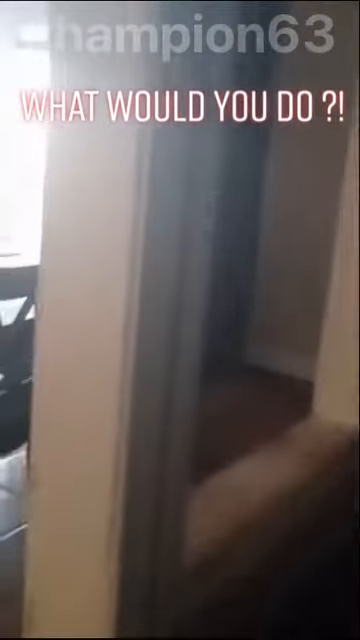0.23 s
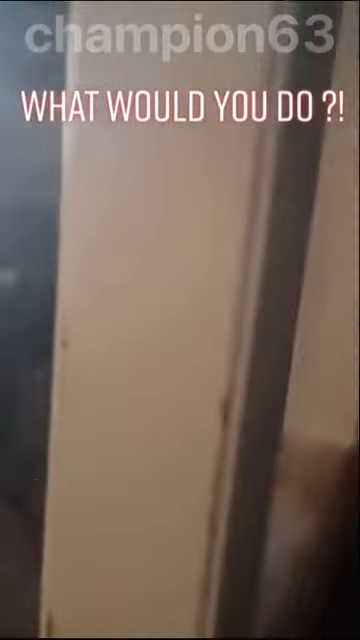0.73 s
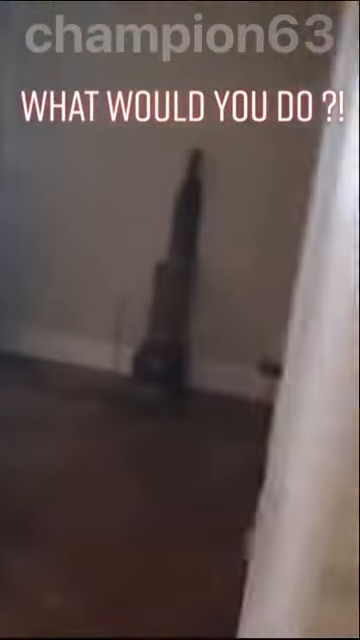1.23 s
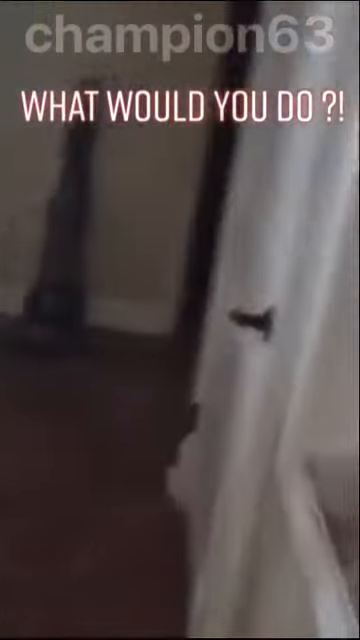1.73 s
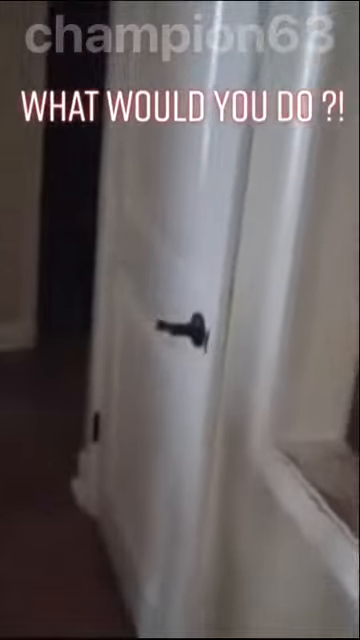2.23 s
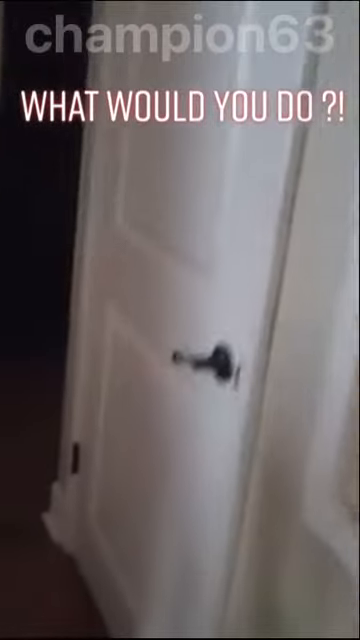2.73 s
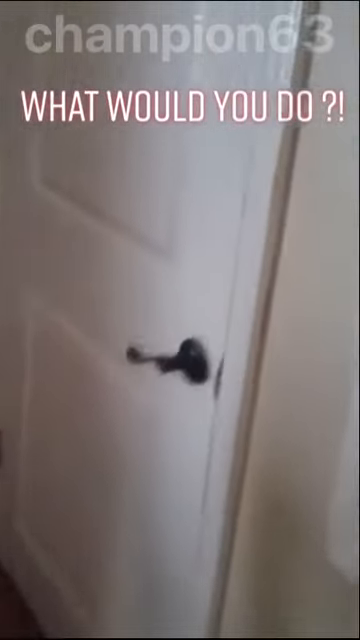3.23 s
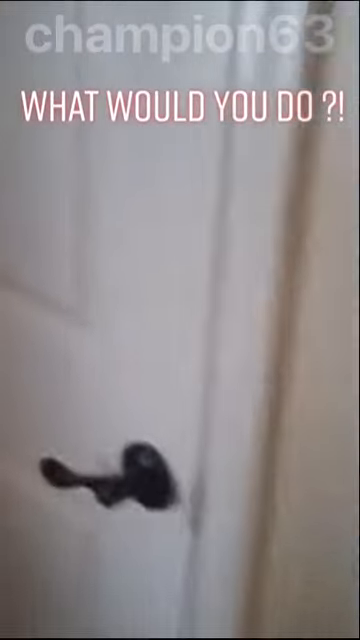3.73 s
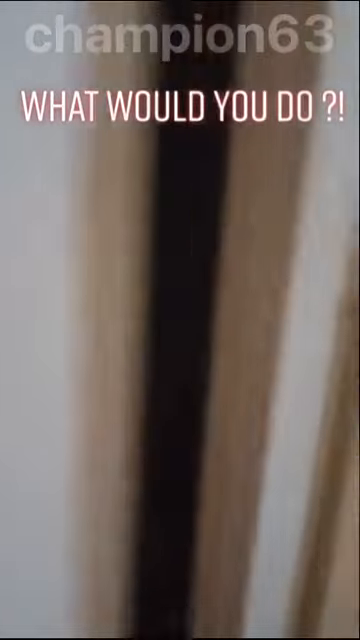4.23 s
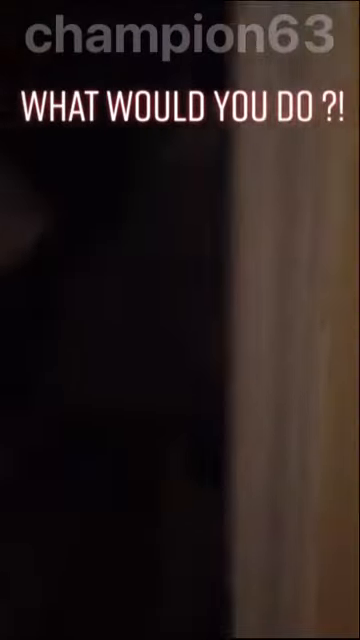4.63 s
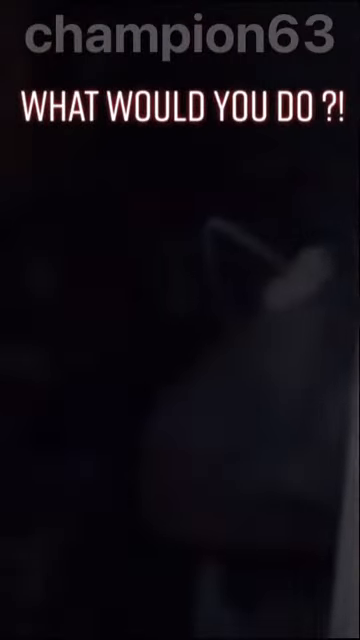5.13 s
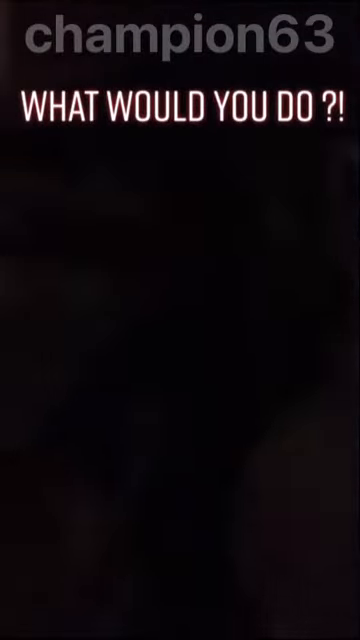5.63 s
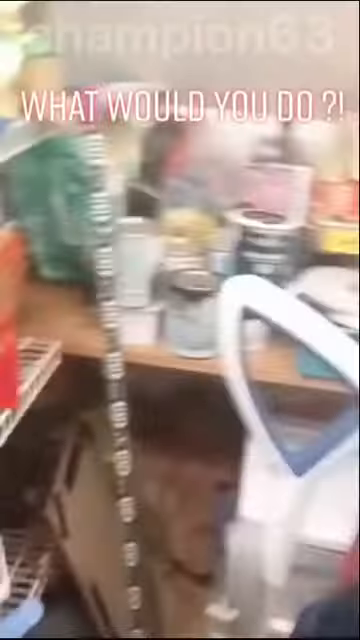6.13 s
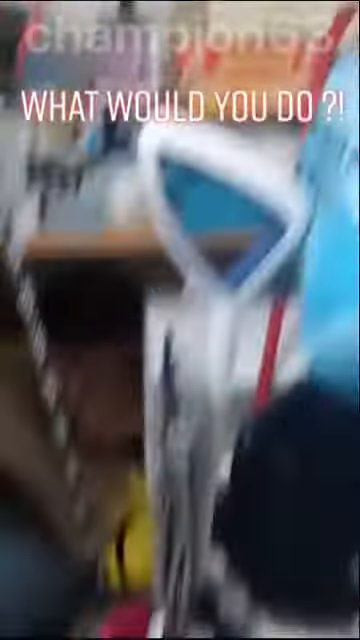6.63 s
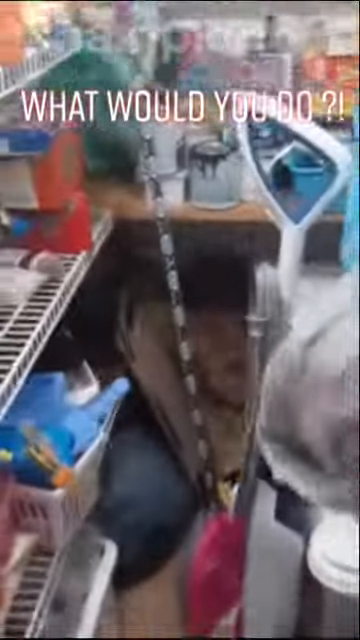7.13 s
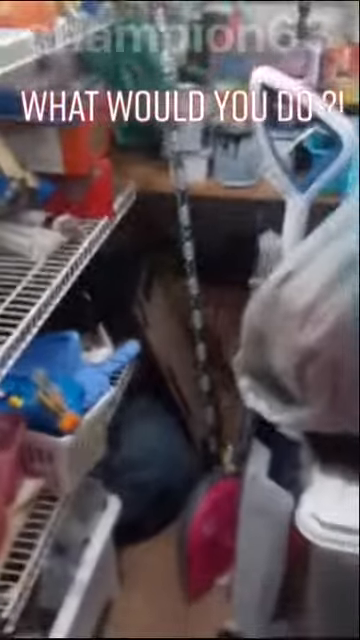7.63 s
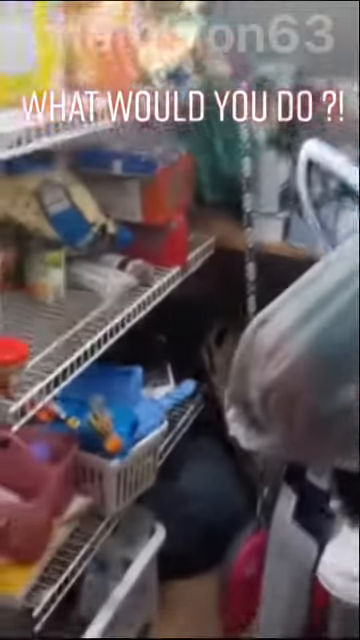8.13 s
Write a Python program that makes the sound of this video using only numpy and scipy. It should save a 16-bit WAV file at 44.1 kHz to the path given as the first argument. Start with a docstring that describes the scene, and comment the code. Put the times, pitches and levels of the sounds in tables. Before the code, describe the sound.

The tail of an earlier bang opens, then evenly spaced heavy thuds ring a hollow door and shake its frame in a reverberant hall until about two and a half seconds. A quiet gap follows. The handle snaps open with bright metallic clatter, the door knocks hard, hands and cloth rub, and goods in a small pantry tick and bump, over faint rumble and hiss on a handheld phone.

```python
"""Banging on a hollow pantry door

Bangs boom through a tiled hall: ringing modes of leaf and panels, and a noisy rattle of the frame.
Then the latch clatters, door and goods knock and tick (modes and noise bursts), hands and cloth rustle.
House rumble and faint hiss lie beneath, as noise shaped in third-octave bands.
The sound is wide at first; just before 4 s it closes to the same signal in both channels."""
import sys
import numpy as np
from scipy import signal
from scipy.fft import rfft, irfft, next_fast_len
from scipy.io import wavfile
from scipy.ndimage import uniform_filter1d

SR = 44100
rng = np.random.default_rng(int(sys.argv[2]) if len(sys.argv) > 2 else 0)


def waveform_to_disk(signal):
    """Save audio, clipped to [-1, 1], as 16-bit WAV at the path in sys.argv[1]."""
    frames = np.transpose(np.atleast_2d(signal))
    scaled = np.clip(frames, -1, 1) * 32767
    samples = np.round(scaled).astype(np.int16)
    wavfile.write(sys.argv[1], SR, samples)


N = 369990  # length in samples

# Bangs on the door; the first precedes the start, so only its tail sounds. Each row: start in seconds,
# panel in dB, boom of the whole leaf in dB, frame rattle in dB (power above 1 kHz),
# treble rise of the rattle in seconds, brightness in dB per octave.
BANGS = [(-.31, -28, -18, -18, .01, 0), (0.184, -24, -21.5, -26, 0.019, 0),
         (0.65, -21, -19.5, -24, 0.013, -0.5), (1.112, -25.5, -19.5, -26, 0.017, -0.5),
         (1.605, -22, -17.5, -24.5, 0.013, 0), (2.09, -23, -20, -24.5, 0.0074, 0),
         (2.515, -29, -18, -22.5, 0.015, 0)]
# Leaf falling back against the stop: delay in seconds, level in dB re the rattle, T60 in seconds.
REBOUND = (0.2877, -24, 0.43)
# Modes of the whole leaf. Each row: frequency in Hz, relative level in dB, T60 in seconds before stretch.
LEAF_MODES = [(65, 5, 0.11), (73.6, 1, 0.56), (101.5, 12.5, 0.17), (113.6, -3, 0.67)]
# Modes of the door panels. Each row: frequency in Hz, relative level in dB, T60 in seconds.
PANEL_MODES = [(143.9, -4.5, 0.25), (170.5, -8, 0.76), (229, -4, 0.57), (261.4, -12, 0.71),
               (298, 3.5, 0.48), (328, -15.5, 0.76), (370, -9, 0.55), (418.7, -8, 0.55), (460, -1, 0.46),
               (583, -25, 0.18), (700, -25, .3), (774, -23, 0.38), (890, -16, 0.49), (970, -11, 0.23),
               (1077, -19, 0.32), (1294, -13.5, 0.37)]
# Frame rattle spectrum. Each row: frequency in Hz, relative density in dB per Hz.
RATTLE_SPECTRUM = [(45, -15), (70, -8.5), (110, -4.5), (180, 0), (290, -3), (420, -6.5), (900, -17.5),
                   (2500, -25), (8900, -29.5), (12200, -37), (16000, -71)]
# Hall decay. Each row: frequency in Hz, T60 in seconds.
HALL_DECAY = [(50, 0.71), (130, 0.46), (350, 0.53), (920, 0.5), (2430, 0.5), (6400, 0.4)]
# Close knocks of door and goods. Each row: start in seconds, body in dB, crack in dB, body centre in Hz,
# T60 in seconds, crack brightness in dB per octave, leaf boom in dB.
KNOCKS = [(2.604, -21.5, -51, 267, 0.39, -2, -26), (4.033, -25, -32, 433, 0.2, -0.5, -39),
          (4.08, -21, -22.5, 420, 0.28, 0, -34.5), (4.14, -27.5, -33, 165, 0.32, -5, -40),
          (4.55, -20.5, -25, 300, 0.64, -1, -47.5), (4.626, -15, -19, 340, 0.17, 1, -39.5),
          (4.647, -27, -30.5, 297, 0.39, -0.5, -38), (5.37, -36, -58, 144, 0.27, 2, -61),
          (5.414, -45, -71, 153, 0.16, 2, -55), (5.997, -45, -72, 140, .08, 6, -50.5),
          (6.084, -32.5, -33.5, 152, 0.21, 0.5, -48), (6.15, -30, -44.5, 165, 0.35, -7.5, -51),
          (6.188, -35, -43, 205, 0.11, -2, -48), (6.271, -25, -21, 325, 0.13, 1.5, -37),
          (6.228, -35, -60, 180, .2, -1, -53), (6.3, -25, -55.5, 162, 0.23, -9.5, -63),
          (6.69, -19, -54, 165, 0.1, -3, -54), (6.777, -44, -41, 140, 0.11, 0, -41),
          (6.812, -47, -48, 140, 0.075, 0.5, -37), (6.965, -38, -50, 140, 0.054, 0, -42.5)]
# Crack spectrum. Each row: frequency in Hz, relative density in dB per Hz.
CRACK_SPECTRUM = [(290, -11.5), (500, 1.5), (831, -3), (1180, -2.5), (1480, -6), (1690, -7), (3340, -10.5),
                  (13800, -39), (16000, -43)]
# Latch and handle hits. Each row: start in seconds, clatter in dB, clatter T60 in seconds, metal ring in dB.
LATCH_HITS = [(4.019, -32, .1, -36.5), (4.027, -18.5, 0.061, -17), (4.0313, -20, 0.051, -19.5),
              (4.0414, -18, 0.078, -24.5), (4.0556, -19, 0.036, -16), (4.0732, -22, 0.29, -30),
              (4.434, -36.5, 0.056, -43), (4.463, -37, 0.051, -41)]
# Metal modes. Each row: frequency in Hz, relative level in dB, T60 in seconds before stretch.
LATCH_MODES = [(2040, -5.5, 0.065), (3000, -10, 0.14), (3410, -21, 0.13), (3950, -14.5, .12),
               (4600, -15.5, .12), (5070, 4.5, 0.059), (5210, -3, 0.041), (5900, -6.5, 0.12),
               (6580, -7.5, .1)]
# Clatter spectrum. Each row: frequency in Hz, relative density in dB per Hz.
CLATTER_SPECTRUM = [(350, -33.5), (600, -15), (834, -13), (1150, -9), (1500, -18), (2150, -7.5),
                    (2440, -13), (3040, -5.5), (5120, -5.5), (16000, -25)]
# Small ticks. Each row: start in seconds, level in dB, centre in Hz.
TICKS = [(3.465, -51, 3350), (4.3321, -41.5, 1540), (4.9964, -59, 1920), (5.1964, -47, 6370),
         (5.2036, -45, 3490), (5.2606, -48.5, 3490), (5.3083, -55, 6090), (5.3213, -51, 6230),
         (5.4714, -54, 1600), (5.719, -44, 4540), (5.7672, -44, 3900), (5.8616, -53, 5730),
         (6.3694, -51.5, 2100), (6.6715, -36, 5000), (6.745, -42, 7000), (7.0297, -46, 5000),
         (7.087, -47, 2500), (7.098, -50, 2000), (7.126, -40, 7500), (7.197, -53, 2280), (7.23, -49, 1920),
         (7.5569, -37.5, 3940), (7.7994, -64, 1840), (8.0153, -48, 3520)]
# Pantry answer to a tick: level in dB re the tick, T60 in seconds.
TICK_TAIL = (-9.5, 0.29)
# Pantry answer to knocks and latch: level in dB re the hit, T60 in seconds.
PANTRY_TAIL = (-26, 0.47)
# Steady rustle of hands and cloth. Each row: time in seconds, level in dB, brightness in dB per octave,
# airy top in dB.
RUSTLE = [(2.9, -72, -1, -70), (3.05, -76, -1, -76), (3.75, -72, 1, -73), (3.92, -60, 1, -62),
          (4.2, -50, 0, -62), (4.3, -51, 0, -58), (4.4, -57, 1, -60), (4.53, -53, 1, -58),
          (4.75, -49, -1, -57), (4.88, -60, 0, -60), (4.94, -68, 1, -70), (5.13, -67, 1, -68),
          (5.24, -58, -1, -69), (5.45, -57, 0, -66), (5.7, -59, 2, -62), (5.86, -60, 2, -66),
          (5.93, -74, -1, -73), (6.25, -66, 2, -72), (6.36, -56, 1, -63), (6.65, -59, 2, -62),
          (6.95, -56, 0, -59), (7.14, -61, -1, -69), (7.3, -74, 0, -72), (8.39, -78, 0, -75)]
# Hands, cloth and goods rubbing. Each row: start in seconds, length in seconds, rise in seconds,
# level in dB, centre in Hz, width in octaves, low rub in dB.
RUBS = [(3.855, .05, 0.023, -55, 5170, .3, -80), (3.923, 0.056, .002, -47.5, 4100, 1.6, -63),
        (3.926, 0.06, .004, -48.5, 13200, 0.27, -80), (4.443, 0.015, .003, -43.5, 3000, 2, -67),
        (4.461, 0.02, .006, -36, 2980, 1.9, -63), (4.467, 0.014, .005, -37, 11000, 1, -80),
        (4.499, 0.038, .005, -48, 3000, 3, -65), (4.995, 0.018, 0.018, -61.5, 1900, 0.44, -99),
        (5.085, .06, 0.033, -59, 4800, 0.17, -80), (5.166, 0.061, 0.035, -59.5, 1190, 0.31, -80),
        (5.327, 0.064, 0.044, -63, 900, 0.57, -80), (5.464, 0.12, 0.05, -54.5, 6500, 0.9, -80),
        (6.086, .045, .003, -52.5, 1500, 4.1, -42), (6.139, 0.016, .012, -37.5, 1900, 0.18, -80),
        (6.139, 0.077, 0.0092, -40.5, 3540, 7.5, -41), (6.19, 0.022, .012, -50, 2300, .25, -80),
        (6.676, 0.012, .003, -48, 700, 1.7, -44), (6.692, .12, 0.07, -42.5, 3480, 7.5, -42.5),
        (6.804, 0.094, 0.021, -39.5, 3940, 7.5, -52), (6.956, 0.13, 0.12, -52, 4500, 3.6, -70)]
# Cloth spectrum. Each row: frequency in Hz, relative density in dB per Hz.
CLOTH_SPECTRUM = [(350, -27), (600, -4), (984, -5.5), (1230, -7), (1470, -1.5), (2650, -1.5), (5790, -1),
                  (8990, -11.5), (13800, -19.5), (16000, -20.5)]
# Rumble of the house and of carrying. Each row: time in seconds, level above 100 Hz in dB,
# deep part below 100 Hz in dB.
RUMBLE = [(2.95, -51.5, -59), (3.62, -53.5, -69), (3.77, -55.5, -63), (4.07, -47, -57), (4.18, -43, -60),
          (4.34, -49.5, -68), (4.74, -46.5, -59), (5.0, -56, -65.5), (5.59, -53.5, -67), (5.78, -56.5, -64),
          (5.99, -57, -70.5), (6.21, -61, -66), (6.59, -55.5, -57), (6.83, -49, -38), (6.96, -52, -53),
          (7.25, -55.5, -70), (7.83, -59, -66.5), (8.39, -53, -54)]
# Rumble spectrum. Each row: frequency in Hz, relative density in dB per Hz.
HOUSE_SPECTRUM = [(15, -67), (25, -26), (76, 2), (107, -1.5), (140, -1.5), (198, 2), (267, -26.5), (310, 1),
                  (479, -17), (719, -51), (900, -32.5), (1170, -62), (1980, -120)]
# Hiss spectrum. Each row: frequency in Hz, relative density in dB per Hz.
HISS_SPECTRUM = [(290, -26.5), (500, -5.5), (1140, -4.5), (1300, -10), (3290, -19), (5970, -7),
                 (10200, -17), (13400, -13.5), (16000, -11)]
# Stereo width before the channels merge. Each row: frequency in Hz, nominal side re mid in dB.
WIDTH = [(60, -44.5), (110, -20), (200, -23.5), (380, -11), (700, 0.5), (1290, -0.5), (2380, -2.5),
         (4400, -2), (8120, 1), (15000, -5)]
# Stereo lean before the channels merge. Each row: frequency in Hz, nominal left re right in dB.
LEAN = [(60, -3.5), (110, -0.5), (200, -0.5), (380, 1), (700, 4.5), (1290, -1), (2380, -2.5), (4400, -1.5),
        (8120, -10), (15000, 1)]

BANDS_HZ = 30 * 2 ** np.arange(0, 9.3, 1 / 3)  # third-octave centres
TOP_HZ = 16000
NARROW_S = 4.0  # both channels alike from here
BOOM_LAG_S = 0.0034  # the whole leaf swings a little after the first touch
BODY_FALL_DB = -21.5  # panel mode one octave off a knock's centre
CRACK_STRETCH = 0.99  # crack T60 over body T60 at 1 kHz
TICK_T60_S, RUB_T60_S = 0.028, 0.12
LOW_RUB_HZ, AIRY_HZ = 130, 13800
HISS_DB = -69.5


def undb(db):
    """Amplitude gain of a level in dB."""
    return 10 ** (np.asarray(db) / 20)


def on_log(table, hz):
    """Value of a (Hz, value) table at hz, linear in log frequency."""
    table = np.array(table)
    return np.interp(np.log(hz), np.log(table[:, 0]), table[:, 1])


def shares(spectrum):
    """Band gains of a density spectrum, total power 1."""
    g = undb(on_log(spectrum, BANDS_HZ)) * np.sqrt(BANDS_HZ)
    g = g * (BANDS_HZ > spectrum[0][0] * .9)
    return g / np.sqrt(np.sum(g ** 2))


def bell(hz, octaves, colour=1):
    """Band gains gathered about a centre, total power 1."""
    g = colour * np.exp(-(np.log2(BANDS_HZ / hz) / octaves) ** 2)
    return g / np.linalg.norm(g)


def curve(table):
    """Columns of a (seconds, ..) table at every sample."""
    s, *columns = np.transpose(table)
    return [np.interp(np.arange(N) / SR, s, c) for c in columns]


def walk(rate_hz):
    """Random levels held 1 / rate_hz seconds, smoothed twice; spread near 1."""
    k = int(SR / rate_hz)
    steps = np.repeat(rng.standard_normal(N // k + 1), k)
    return 1.07 * uniform_filter1d(uniform_filter1d(steps, k), k)[:N]


def add(power, s, gains, rise_s, t60_s):
    """Add a burst's power envelope, rising then decaying in each band; the bass builds up more slowly."""
    i, t60_s = int(s * SR), np.clip(t60_s, .02, .8)[:, None]
    t = np.arange(max(-i, 0), min(int(1.2 * SR * np.max(t60_s)), N - i)) / SR
    rise = max(rise_s, 1e-4) * (1 + 600 / BANDS_HZ[:, None])
    shape = (1 - np.exp(-t / rise)) * 10 ** (-3 * t / t60_s)
    start = max(i, 0)
    power[:, start:start + len(t)] += (gains[:, None] * shape) ** 2


def ring(s, db, modes, push_s, spread_db, stretch, detune, scatter=True):
    """A soft push sets modes ringing, with random shares, pitch and, if scattered, phase."""
    out, i = np.zeros(N), int(s * SR)
    t = np.arange(max(-i, 0), min(SR, N - i)) / SR
    chance, x = rng.standard_normal((len(modes), 3)), 0
    for (hz, mode_db, t60_s), (a, b, c) in zip(modes, chance):
        fade = 10 ** (-3 * t / np.clip(t60_s * stretch, .01, .8))
        cycles = hz * (1 + detune * c) * t + b * scatter
        x = x + undb(mode_db + spread_db * a) * fade * np.sin(2 * np.pi * cycles)
    push = np.sin(np.pi / 2 * np.minimum(t / push_s, 1)) ** 2
    start = max(i, 0)
    out[start:start + len(t)] = x * undb(db) * push
    return out


def bangs(power, wide):
    """The leaf booms, the panels ring a moment later, the frame rattles into the hall."""
    out, hall_s = 0, on_log(HALL_DECAY, BANDS_HZ)
    rattle = shares(RATTLE_SPECTRUM)
    rattle = rattle / np.linalg.norm(rattle[BANDS_HZ > 1000])
    octaves = np.log2(np.maximum(BANDS_HZ, 500) / 2000)
    back_s, back_db, back_t60_s = REBOUND
    for s, panel_db, boom_db, rattle_db, rise_s, tilt_db in BANGS:
        out = out + ring(s + BOOM_LAG_S, boom_db, LEAF_MODES, 0.012, 1.0, 0.83, 0.016, scatter=False)
        out = out + ring(s + 0.00813, panel_db, PANEL_MODES, 0.015, 1.4, 1, 0.0311)
        # the two skins of the hollow leaf ring slightly apart and beat
        out = out + ring(s + .02, panel_db, PANEL_MODES, 0.041, 2.5, 1, 0.0402)
        # what comes round by the side walls builds up more slowly
        for into, slow_s in ((power, 0), (wide, .018)):
            add(into, s, rattle * undb(rattle_db + tilt_db * octaves), rise_s + slow_s, hall_s)
            rebound = shares(CLOTH_SPECTRUM) * undb(rattle_db + back_db)
            add(into, s + back_s, rebound, .015, back_t60_s + 0 * hall_s)
    return out


def knocks(power):
    """Short blows: leaf boom, panel modes near each body centre, a crack that fades faster in the treble."""
    out = 0
    tail_db, tail_s = PANTRY_TAIL
    for s, body_db, crack_db, centre_hz, t60_s, tilt_db, boom_db in KNOCKS:
        modes = [(hz, BODY_FALL_DB * np.log2(hz / centre_hz) ** 2, 1) for hz, _, _ in PANEL_MODES]
        # mode T60 of 1 s is stretched to the knock's own
        out = out + ring(s, body_db, modes, 0.011, 1.48, t60_s, .03, scatter=False)
        out = out + ring(s, boom_db, LEAF_MODES, .01, 2.3, 0.57, 0.06)
        g = shares(CRACK_SPECTRUM) * undb(crack_db + tilt_db * np.log2(BANDS_HZ / 2000))
        add(power, s, g, .003, CRACK_STRETCH * t60_s * (BANDS_HZ / 1000) ** -.15)
        add(power, s, g * undb(tail_db), .01, tail_s + 0 * g)
    return out


def latch(power):
    """Metal parts hit each other: bright modes over a broad clatter."""
    out = 0
    tail_db, tail_s = PANTRY_TAIL
    for s, clatter_db, t60_s, ring_db in LATCH_HITS:
        out = out + ring(s, ring_db, LATCH_MODES, .001, 2.1, 0.55, 0.008)
        g = shares(CLATTER_SPECTRUM) * undb(clatter_db)
        add(power, s, g, .001, t60_s + 0 * g)
        add(power, s, g * undb(tail_db), .01, tail_s + 0 * g)
    return out


def ticks(power):
    """Small hard things touch: a click about its own centre and a faint tail."""
    tail_db, tail_s = TICK_TAIL
    for s, db, hz in TICKS:
        g = undb(db) * bell(hz, 1.22)
        add(power, s, g, .0003, TICK_T60_S + 0 * g)
        add(power, s, g * undb(tail_db), .002, tail_s + 0 * g)


def friction():
    """Power of steady rustle and of rubs that rise, hold and die; catching fibres crackle in all bands."""
    t, cloth = np.arange(N) / SR, shares(CLOTH_SPECTRUM)
    level_db, tilt_db, airy_db = curve(RUSTLE)
    power = np.array([(g * undb(level_db + tilt_db * np.log2(hz / 4000))) ** 2
                      for g, hz in zip(cloth, BANDS_HZ)])
    power += (bell(AIRY_HZ, .26)[:, None] * undb(airy_db)) ** 2
    power *= t > RUSTLE[0][0]
    for s, length_s, rise_s, db, hz, octaves, low_db in RUBS:
        g = undb(db) * bell(hz, octaves, cloth) + undb(low_db) * bell(LOW_RUB_HZ, 1.1)
        i = int(s * SR)
        u = t[:int((length_s + RUB_T60_S) * SR)]
        rise = np.sin(np.pi / 2 * np.minimum(u / rise_s, 1))
        shape = rise * 10 ** (-3 * np.maximum(u - length_s, 0) / RUB_T60_S)
        power[:, i:i + len(u)] += (g[:, None] * shape) ** 2
    crackle_db = 2.0 * walk(400)  # shared by all bands
    return np.array([p * undb(crackle_db + 1.5 * walk(25)) ** 2 for p in power])


def house():
    """Power of the rumble, which throbs and flickers band by band, and of a faint hiss of even level."""
    level_db, deep_db = curve(RUMBLE)
    throb_db, deep = 2.0 * walk(14), BANDS_HZ < 100
    g = shares(HOUSE_SPECTRUM) * (BANDS_HZ < 900)
    g = g / np.where(deep, np.linalg.norm(g[deep]), np.linalg.norm(g[~deep]))
    rumble = []
    for gain, is_deep in zip(g, deep):
        band_db = deep_db if is_deep else level_db
        rumble.append((gain * undb(band_db + throb_db + 0.5 * walk(8.9))) ** 2)
    return np.array(rumble) + (shares(HISS_SPECTRUM)[:, None] * undb(HISS_DB)) ** 2


def scene():
    """Ringing parts plus noise bands that follow their power; a side signal widens the first seconds."""
    wide = house()  # power that also feeds the side signal
    power = wide + friction()
    far = bangs(power, wide)
    rings = far + knocks(power) + latch(power)
    ticks(power)
    size = next_fast_len(N)
    hz = np.maximum(np.arange(size // 2 + 1) * SR / size, 1)
    noise = rfft(rng.standard_normal((2, size)))
    mid, side = rings, 0
    flicker = undb(1.2 * walk(250))  # quick random unevenness in all the mid noise
    for k, centre in enumerate(BANDS_HZ):
        mask = np.cos(np.pi / 2 * np.clip(3 * np.log2(hz / centre), -1, 1))
        a, b = irfft(noise * mask / np.sqrt(np.mean(mask ** 2)), size)[:, :N]
        mid = mid + a * flicker * undb(2.4 * walk(40)) * np.sqrt(power[k])
        # left/right ratio in dB to side/mid ratio
        lean = np.tanh(on_log(LEAN, centre) * np.log(10) / 40)
        side = side + a * np.sqrt(wide[k]) * lean
        side = side + b * np.sqrt(wide[k]) * undb(on_log(WIDTH, centre))
    # delayed ringing, added to one channel and subtracted from the other, widens the bangs
    late = np.concatenate([np.zeros(int(.01 * SR)), far])[:N]
    side = side + irfft(rfft(late, size) * undb(on_log(WIDTH, hz)), size)[:N]
    side = side * np.clip((NARROW_S - np.arange(N) / SR) / .03, 0, 1)
    return np.array([mid + side, mid - side])


def record(dry):
    """The phone drops the deepest bass and cuts the top."""
    x = signal.sosfilt(signal.butter(2, 40, "high", fs=SR, output="sos"), dry)
    return signal.sosfilt(signal.ellip(10, .2, 80, TOP_HZ, fs=SR, output="sos"), x)


dry = scene()
out = record(dry)
waveform_to_disk(out)
```